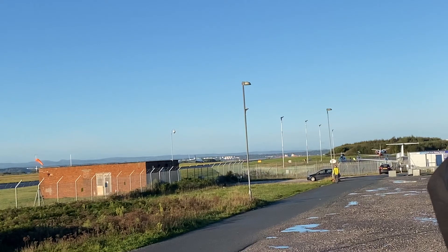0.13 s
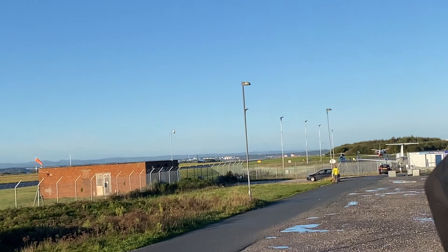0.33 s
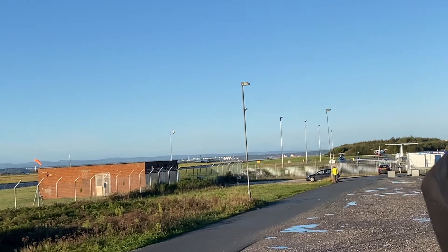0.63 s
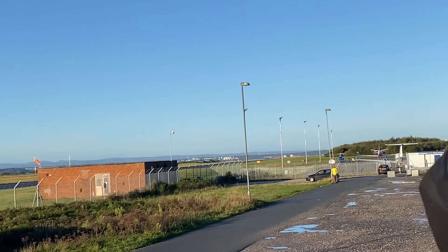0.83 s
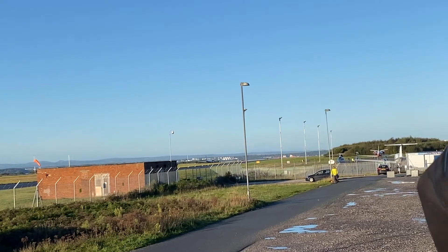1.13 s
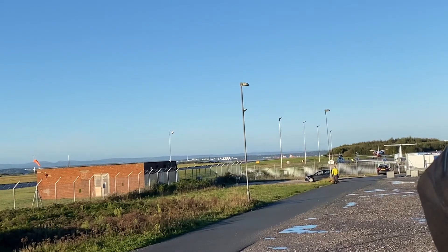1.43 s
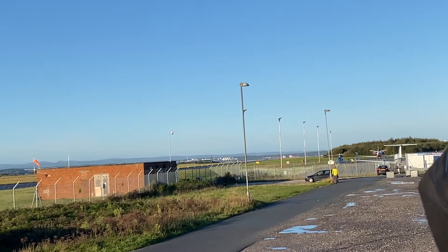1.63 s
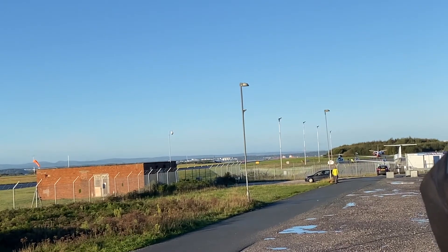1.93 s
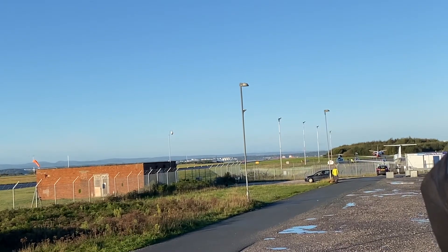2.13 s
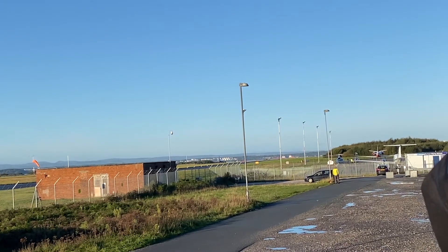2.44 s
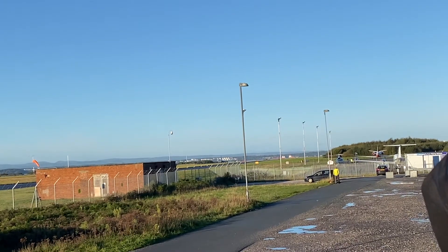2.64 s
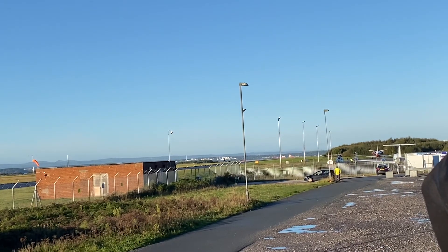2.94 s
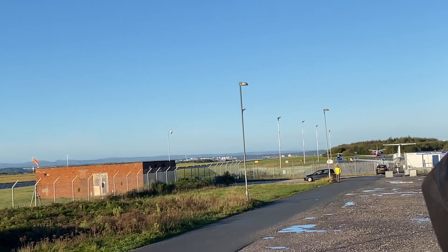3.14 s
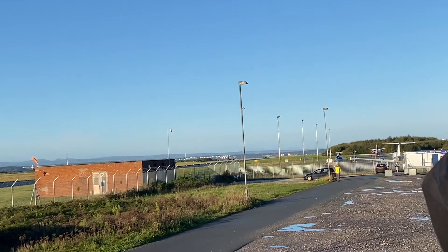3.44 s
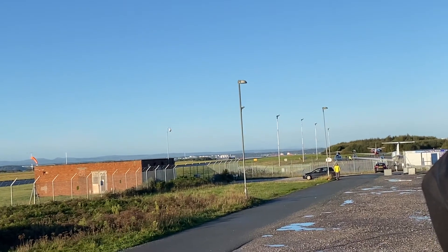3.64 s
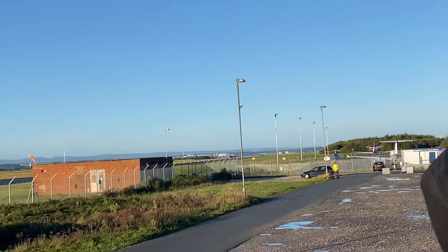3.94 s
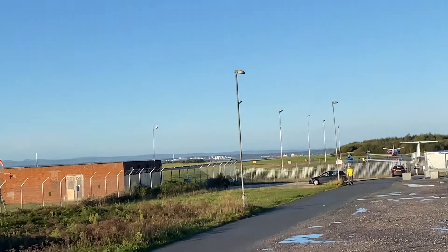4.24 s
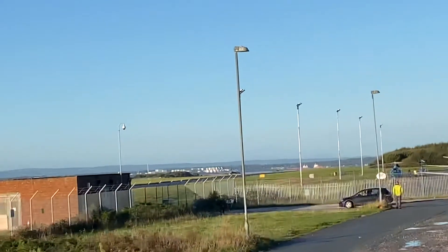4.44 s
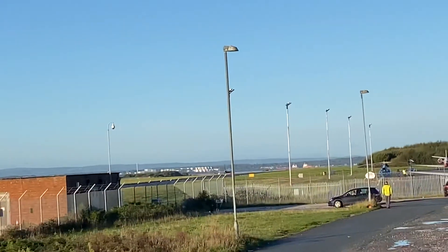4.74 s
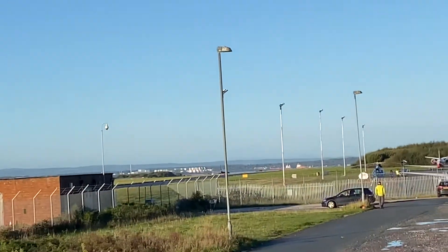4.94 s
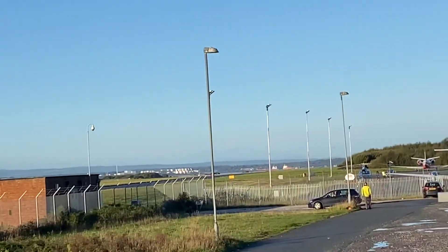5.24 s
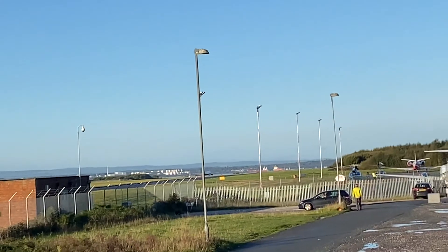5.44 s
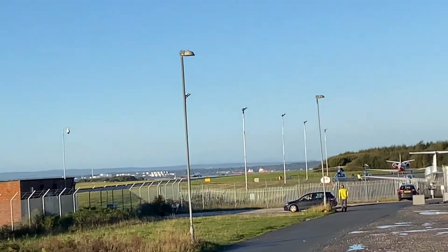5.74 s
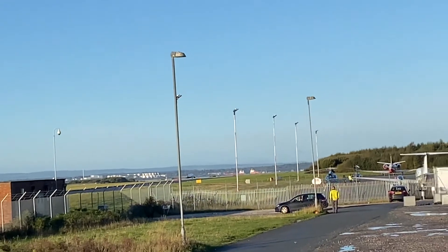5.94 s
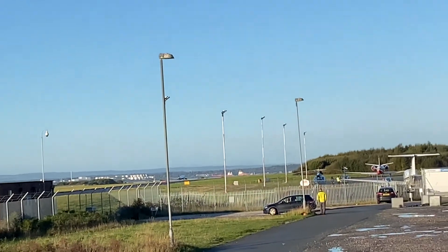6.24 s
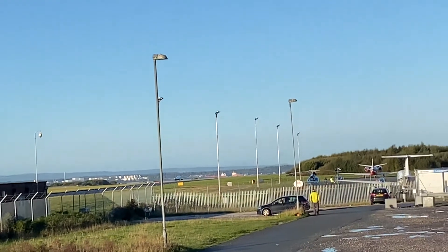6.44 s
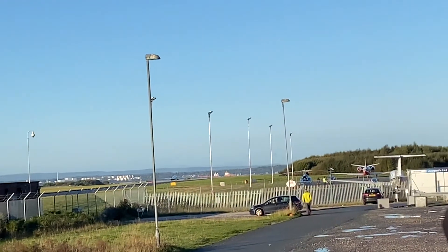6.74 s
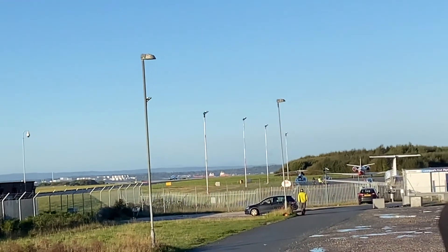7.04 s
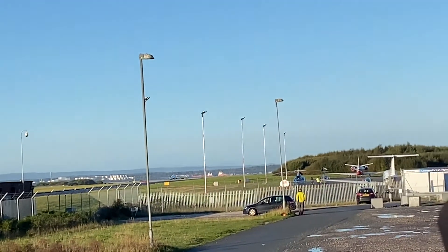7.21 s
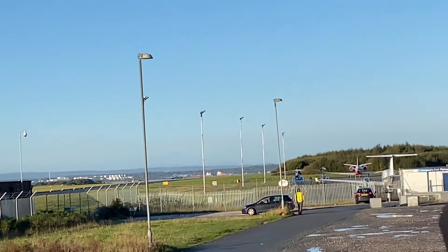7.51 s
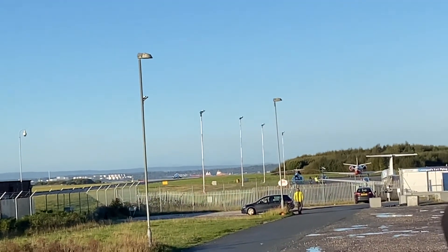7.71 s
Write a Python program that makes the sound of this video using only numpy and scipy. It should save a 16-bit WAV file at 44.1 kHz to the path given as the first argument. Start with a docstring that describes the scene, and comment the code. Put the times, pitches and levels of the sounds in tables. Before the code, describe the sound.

Outdoors at an airfield, the low rumble and rushing roar of a distant departing jet carry on throughout, easing slightly as it recedes. Soft booms and thumps rise out of the rumble, mostly in the first half, and light gusts brush the microphone. Closer by, small birds give quiet, high chirps and thin whistles with short echoes, thinning out toward the end.

```python
"""A deep rumble, a roar and a dull rush: a jet airliner climbs away far across an airfield.
Turbulent mixing of its exhaust radiates broadband noise, coloured by interference with the ground echo
and by absorption in the air; its fan adds a faint tone. Light wind buffets the two microphone ports.
Small songbirds whistle and chirp nearby in gliding, almost pure tones with short echoes.
Low booms and soft thumps come and go; faint clicks and the hiss of the microphone lie underneath."""
import sys
import numpy as np
from scipy import signal
from scipy.io import wavfile
from scipy.ndimage import uniform_filter1d

SR = 44100
rng = np.random.default_rng(int(sys.argv[2]) if len(sys.argv) > 2 else 0)


def waveform_to_disk(signal):
    """Save audio, clipped to [-1, 1], as 16-bit WAV at the path in sys.argv[1]."""
    frames = np.transpose(np.atleast_2d(signal))
    scaled = np.clip(frames, -1, 1) * 32767
    samples = np.round(scaled).astype(np.int16)
    wavfile.write(sys.argv[1], SR, samples)


N = 347067

# Spectra of the four exhaust ranges, lowest first: f/Hz, relative level/dB
RUMBLE_SPECTRUM = [(12, -44.5), (20, 1), (30, 3.5), (40, 9), (54, 21), (70, 19), (95, 2), (120, -60.5),
                   (200, -120)]
GROWL_SPECTRUM = [(53, -19.5), (90, -1.5), (129, -3), (195, -28), (250, -45.5), (430, -120)]
ROAR_SPECTRUM = [(100, -78.5), (190, -5), (280, 4), (405, -2.5), (527, 1.5), (700, -1.5), (850, -60.5),
                 (1400, -120)]
RUSH_SPECTRUM = [(410, -41.5), (700, -2.5), (763, 3), (842, -0.5), (907, -4), (976, -3), (1280, -9),
                 (1400, -10.5), (1690, -14.5), (1840, -14), (3050, -34), (3960, -46), (6710, -120)]
# The deep rumble, swelling and sinking unevenly: t/s, level/dB
RUMBLE_LEVELS = [(0, -25), (2.6, -28), (3.4, -30.5), (3.7, -23.5), (4.2, -29.5), (4.8, -24.5), (5.3, -27),
                 (5.75, -37.5), (6.2, -24.5), (6.4, -29.5), (6.85, -34), (7., -34.5), (7.2, -37.5),
                 (7.87, -35)]
# The other ranges: t/s, growl level/dB, roar level/dB, rush level/dB, lift near 1600 Hz/dB
EXHAUST_LEVELS = [(0, -35.5, -36, -44, -2.5), (1., -35.5, -39.5, -46, -3), (2.1, -34, -36, -42.5, -2.5),
                  (2.8, -34.5, -31.5, -41, 0), (3.5, -38, -37.5, -43, -2), (4.2, -32.5, -39.5, -44, -1),
                  (5.1, -36, -39, -44.5, 2.5), (5.8, -34, -40, -44, 3.5), (6.4, -37.5, -39.5, -43.5, 4.5),
                  (7.1, -33, -42, -43.5, -2), (7.87, -35, -43.5, -48, 2)]
def jet_exhaust():
    """Turbulent mixing noise in four swelling ranges; the upper two tilt as the air path changes."""
    t = np.arange(N) / SR
    growl_db, roar_db, rush_db, lift_db = curves(EXHAUST_LEVELS)
    lift = (lambda hz: bell(hz, 1600, 620), lift_db)
    dips = (ground_dips, -9.5 * bell(t, 4.3, 2.8))  # deepest midway through the climb
    upper_dips = (upper_ground_dips, -4 * bell(t, 6.1, 1.4))
    # Slopes in dB per octave: the roar loses bass, the rush dulls as the path lengthens.
    roar_tilt = (lambda hz: np.log2(hz / 330), -7.5 + .77 * t)
    rush_tilt = (lambda hz: np.log2(hz / 1100), 6 - .5 * t)
    absorption = (lambda hz: np.maximum(np.log2(hz / 3000), 0), -1.8 * t)
    rumble = noise(RUMBLE_SPECTRUM, size=4096, patchy_db=.5, swell_db=1.2)[0]
    growl = noise(GROWL_SPECTRUM, size=2048, patchy_db=.5, swell_db=1.6)[0]
    roar = noise(ROAR_SPECTRUM, size=2048, patchy_db=.58, swell_db=-1, bands_db=.82,
                 changes=[dips, roar_tilt])[0]
    rush = noise(RUSH_SPECTRUM, size=2048, patchy_db=.18, swell_db=.5, bands_db=1.84,
                 changes=[dips, upper_dips, lift, absorption, rush_tilt])[0]
    deep = amp(curves(RUMBLE_LEVELS)[0]) * rumble + amp(growl_db) * growl
    return deep + amp(roar_db) * roar + amp(rush_db) * rush


def comb(hz, spacing_hz=465):
    """Two-path interference: direct sound and ground echo oppose at odd multiples of half a spacing."""
    return (.5 - .5 * np.cos(2 * np.pi * hz / spacing_hz)) ** 2


def ground_dips(hz):
    """Relative depth of the destructive interference, greatest in the middle range."""
    return comb(hz) * (.11 + .63 * bell(hz, 695, 250)) * (hz > 465)


def upper_ground_dips(hz):
    """The same interference above the middle range."""
    return comb(hz) * np.clip((hz - 900) / 300, 0, 1)


# Sound scattered from both sides of the field: f/Hz, relative level/dB
SCATTER_SPECTRUM = [(150, -33.5), (260, -4), (571, -13), (918, -12), (985, -14), (1390, -17.5), (2900, -47),
                    (3770, -60), (6380, -120)]
def field_scatter(near_db=-44.5, far_db=-55, fade_s=1.5):
    """Scattering gives an incoherent side signal that weakens as the aircraft recedes."""
    level_db = far_db + (near_db - far_db) * np.exp(-np.arange(N) / SR / fade_s)
    return amp(level_db) * noise(SCATTER_SPECTRUM, size=1024, patchy_db=2.4, swell_db=1.2)[0]


# Fan tone before its random modulation: t/s, level/dB
FAN_LEVELS = [(0.0, -47.5), (.36, -55), (0.8, -50.5), (1.3, -54), (2.01, -56), (2.6, -50.5), (3.15, -53.5),
              (3.66, -66.5), (4.32, -53), (5.68, -55.5), (6.55, -50), (6.8, -55), (7.87, -59.5)]
def jet_fan(start_hz=926, end_hz=890, settle_s=2.6):
    """A tone that sinks as the jet draws away; the long path modulates its amplitude and phase."""
    hz = end_hz + (start_hz - end_hz) * np.exp(-np.arange(N) / SR / settle_s)
    a, b, c, d = drifts(4, size=1700)
    modulation = np.array([1.3 + a + 1j * b, c + 1j * d])
    front, side = (modulation * np.exp(2j * np.pi * np.cumsum(hz) / SR)).real
    return amp(curves(FAN_LEVELS)[0]) * ports(front, .4 * side)


# Low booms in the rumble and soft thumps: t/s, envelope peak level/dB, f/Hz
BOOMS = [(.049, -28.5, 59.4), (0.551, -15, 67.5), (1.802, -18, 65), (2.162, -17, 60), (2.347, -24, 54.6),
         (3.033, -20, 56.3), (3.94, -19, 65), (6.998, -15.5, 57), (0.327, -25, 195), (0.799, -25, 153),
         (1.002, -24, 221), (1.35, -30, 145), (3.47, -25, 166), (7.249, -25.5, 182), (7.438, -37, 202)]
def booms():
    """Gaussian tone bursts, a few cycles long and alike in both channels."""
    out, t = np.zeros(N), np.arange(-2000, 2000) / SR
    for s, db, hz in BOOMS:
        burst = amp(db) * bell(t, 0, .0053 + .9 / hz) * np.sin(2 * np.pi * hz * t)
        out[round(s * SR) - 2000:][:4000] += burst
    return out


# Buffeting at the ports: f/Hz, relative level/dB
WIND_SPECTRUM = [(9.4, -49), (16, -17), (45, 2.5), (70, -0.5), (141, -3.5), (420, -38), (550, -50.5),
                 (920, -120)]
# Gusts: t/s, level/dB
GUST_LEVELS = [(0, -33), (1.4, -35), (2.4, -38), (3.2, -41.5), (4.3, -37.5), (5.15, -31), (6.6, -39),
               (7.4, -30), (7.87, -46)]
def wind():
    """Turbulent pressure fluctuations, uncorrelated at the two ports."""
    return amp(curves(GUST_LEVELS)[0]) * noise(WIND_SPECTRUM, size=2048, patchy_db=2.2, swell_db=3.2)


# Trills gliding through a turning point: start t/s, turn delay/s, length/s, level/dB,
# first f/Hz, turn f/Hz, last f/Hz, chip rate/Hz, rise within a chip/Hz
BIRD_TRILLS = [(0.244, 0.012, 0.043, -68, 4830, 5180, 4700, 114, 311),
               (0.383, 0.011, 0.034, -68.5, 4400, 4670, 4480, 95, 299.5),
               (0.502, 0.11, .13, -75, 5400, 5400, 5200, 49, 497.5),
               (0.568, 0.036, 0.087, -73, 5200, 4760, 4630, 50.8, 499),
               (5.775, .04, .11, -81, 4800, 4300, 3300, 90, -200),
               (6.018, 0.065, .13, -75.5, 5020, 4550, 3700, 94, -200),
               (4.938, 0.046, 0.11, -65, 3630, 3450, 3730, 50, -200)]
# Notes, loudest at the turn: start t/s, turn delay/s, length/s, level/dB,
# first f/Hz, turn f/Hz, last f/Hz, blur (0-1)
BIRD_NOTES = [ (0.605, .015, 0.029, -83, 6420, 6080, 5230, 0.8),
              (0.629, 0.019, 0.03, -90, 7260, 6600, 6140, 0.9),
              (0.682, 0.013, .025, -78.5, 5950, 6140, 6040, .2),
              (1.481, 0.013, 0.025, -50, 4450, 4010, 4600, 0.4),
              (1.505, 0.011, 0.022, -50, 4340, 3780, 4240, 0.3),
              (1.536, 0.068, 0.066, -48.5, 3896, 3680, 3660, 0.15),
              (1.624, 0.0099, 0.022, -49, 4530, 3700, 3550, 0.03),
              (1.674, 0.018, 0.029, -51, 3810, 3730, 4010, 0.1),
              (2.77, 0.0081, 0.019, -58, 3160, 3500, 3340, 0.03),
              (2.933, 0.025, 0.046, -60, 4200, 3450, 3200, 0.15),
              (3.774, 0.0057, 0.013, -67, 4270, 4030, 3610, 0.6),
              (3.895, 0.011, 0.014, -68, 3980, 3620, 3250, 0.73),
              (3.96, 0.0088, 0.019, -69.5, 4140, 3800, 3400, 0.75),
              (4.034, 0.008, 0.026, -68, 5100, 4300, 2900, 0.9),
              (4.121, 0.01, 0.027, -70, 5180, 4350, 3000, 0.74),
              (4.398, 0.024, 0.029, -58.5, 3490, 3810, 3960, 0.2),
              (4.427, 0.031, 0.056, -54.5, 3900, 3860, 4220, 0),
              (4.692, 0.038, 0.052, -65.5, 5600, 4680, 4230, 0.6),
              (4.78, 0.035, 0.046, -63, 5870, 4430, 3850, 0.36),
              (4.877, 0.031, 0.061, -62.5, 5730, 4130, 3730, 0.35),
              (3.785, 0.02, 0.045, -80, 4600, 4450, 4400, 1),
              (5.97, 0.017, 0.059, -83.5, 4320, 3920, 3600, 0.55),
              (6.193, 0.012, 0.04, -83, 4900, 4400, 5000, 0.4),
              (6.72, 0.021, 0.031, -85, 4150, 3980, 3880, 1),
              (7.599, .014, 0.024, -77, 4800, 4380, 4220, 0.66)]
# Winding whistles, one contour each: t/s, f/Hz, level/dB
BIRD_PHRASES = [
    [(.83, 7300, -69), (.845, 7320, -73), (.93, 7800, -72), (1.01, 7560, -61.5), (1.08, 7580, -63.5)],
    [(1.087, 7700, -67.5), (1.2, 7860, -58.5), (1.225, 8030, -60.5), (1.26, 7850, -63.5), (1.3, 7920, -67),
     (1.406, 7850, -69)],
    [(1.762, 4380, -61), (1.766, 3770, -51.5), (1.8, 4060, -55.5), (1.82, 4350, -44.5),
     (1.846, 4340, -44.5), (1.878, 3350, -52), (1.9, 3360, -52.5), (1.948, 3520, -48.5), (1.984, 3340, -65)],
    [(2.575, 4920, -78), (2.593, 4010, -64.5), (2.623, 3930, -58), (2.637, 3350, -62)],
    [(2.672, 3750, -63), (2.695, 3150, -58), (2.71, 3330, -57), (2.735, 2800, -62)],
    [(3.25, 7250, -84), (3.32, 8350, -85), (3.39, 8850, -91), (3.5, 8600, -90), (3.62, 8350, -93)],
    [(4.205, 6650, -72), (4.217, 7040, -72.5), (4.231, 6450, -57), (4.25, 5970, -56), (4.3, 6460, -61),
     (4.339, 6270, -55)],
    [(4.54, 4930, -76.5), (4.556, 5830, -70.5), (4.586, 6200, -64.5), (4.616, 6170, -59.5),
     (4.636, 5750, -64), (4.66, 5000, -72)],
    [(7.545, 8500, -83), (7.558, 7260, -75), (7.584, 7700, -78.5), (7.61, 6800, -73)],
    [(7.732, 8400, -81.5), (7.745, 7670, -65.5), (7.768, 7950, -77), (7.79, 7300, -74), (7.83, 6800, -69),
     (7.862, 4500, -78)],
]
# Blur of each winding whistle (0-1)
BIRD_PHRASE_BLURS = [.04, .04, .1, .12, .12, .1, .04, .4, .2, .3]
def birds():
    """The direct-to-reverberant ratio falls with distance: farther birds have more blur and echo."""
    a, b = drifts(2, size=60)
    flutter = a + 1j * b
    direct = np.zeros(N)
    for s, turn, length, db, first, middle, last, chips_per_s, rise_hz in BIRD_TRILLS:
        contour = [(s, first, db), (s + turn, middle, db), (s + length, last, db)]
        direct += whistle(contour, flutter, roughness=.4, chips_per_s=chips_per_s, rise_hz=rise_hz)
    reflected = direct.copy()
    notes = [([(s, first, db - 4), (s + turn, middle, db), (s + length, last, db - 6)], blur)
             for s, turn, length, db, first, middle, last, blur in BIRD_NOTES]
    for contour, blur in notes + list(zip(BIRD_PHRASES, BIRD_PHRASE_BLURS)):
        note = whistle(contour, flutter, roughness=blur)
        direct += (1 - .55 * blur) * note
        reflected += (1 + 5 * blur) * note
    return direct + echoes(reflected)


def whistle(contour, flutter, roughness, chips_per_s=0, rise_hz=0):
    """Frequency modulation of a near sine along (t/s, f/Hz, level/dB); gating chops it into chips."""
    s, hz, db = np.transpose(contour)
    start = round(s[0] * SR)
    t = np.arange(start, min(round(s[-1] * SR), N)) / SR
    chip_phase = (t - s[0]) * chips_per_s % 1
    glide_hz = uniform_filter1d(np.interp(t, s, hz), size=1 + len(t) // 12, mode="nearest")
    phase = 2 * np.pi * np.cumsum(glide_hz + rise_hz * (chip_phase - .5)) / SR
    gate = np.sin(np.pi * chip_phase) ** 2 if chips_per_s else 1
    fade = np.clip(np.minimum(t - s[0], s[-1] - t) / .003, 0, 1)
    modulation = 1 + roughness * flutter[start:][:len(t)]
    tone = (modulation * np.exp(1j * phase)).real + amp(-53) * np.cos(2 * phase)
    out = np.zeros(N)
    out[start:][:len(t)] = np.sqrt(2) * amp(np.interp(t, s, db)) * gate * fade * tone
    return out


def echoes(song):
    """Reverberation: close reflections smear each glide, later ones thin out past the nearest sheds."""
    t = np.arange(SR // 2) / SR
    early = 5 * amp(-60 * t / .05) + 1.2 * amp(-60 * t / .12)
    late = amp(-60 * t / 1.3 - 8 * (t > .15) - 9 * (t > .27))
    taps = rng.standard_normal((len(t), 2)).T * (rng.random((len(t), 2)).T < .05)
    taps *= (early + late) * (t > .002)
    stirred = drifts(1, size=600) * song  # moving air blurs the echoes
    front, side = signal.fftconvolve(stirred, taps / np.linalg.norm(taps[0]), axes=1)[:, :N]
    return ports(amp(-10) * front, amp(-23.5) * side)


# Faint clicks close by: t/s, level before filtering/dB
CLICKS = [(3.96, -66), (4.2564, -56), (5.768, -68), (6.802, -66), (7.228, -65), (7.324, -58), (7.35, -68)]
def clicks():
    """Brief transients have broad spectra: fast-decaying noise bursts, band-passed to sound bright."""
    out, t = np.zeros(N), np.arange(200) / SR
    for s, db in CLICKS:
        out[round(s * SR):][:200] += amp(db - 60 * t / .006) * rng.standard_normal(200)
    return signal.sosfilt(signal.butter(2, [3000, 8000], "band", fs=SR, output="sos"), out)


# Microphone hiss: f/Hz, relative level/dB
HISS_SPECTRUM = [(2500, -30.), (3600, 1.), (5000, -1.), (7000, -3.), (8600, -9.), (11000, -7.),
                 (12000, -3.), (12600, -10.), (13500, -18.)]
def microphone_hiss():
    """Self-noise of the microphone, partly correlated between the channels."""
    front, side = amp(-89) * noise(HISS_SPECTRUM, size=1024, patchy_db=.4, swell_db=.2)
    return ports(front, .5 * side)


def amp(db):
    """Amplitude ratio of a level."""
    return 10 ** (np.asarray(db) / 20)


def bell(x, centre, width):
    """Gaussian curve of unit height."""
    return np.exp(-((x - centre) / width) ** 2)


def unit_rms(x):
    """Normalisation to unit mean power."""
    return x / np.sqrt(np.mean(x ** 2) + 1e-20)


def drifts(count, size):
    """Independent low-pass noises, each averaged twice over size samples."""
    return unit_rms(uniform_filter1d(uniform_filter1d(rng.standard_normal((N, count)).T, size), size))


def smooth_grid(grid, frames, bins):
    """Averaging over time and frequency turns random values into patches."""
    return unit_rms(uniform_filter1d(uniform_filter1d(grid, bins, axis=0), frames, axis=1))


def curves(rows):
    """Linear interpolation in time: one value per sample for each column after t/s."""
    s, *columns = np.transpose(rows)
    return [np.interp(np.arange(N) / SR, s, column) for column in columns]


def noise(spectrum, size, patchy_db, swell_db, changes=(), bands_db=0):
    """Fourier synthesis of two uncorrelated noises; a change is a spectral shape times a dB curve."""
    frames, hz = 4 * N // size + 5, np.fft.rfftfreq(size, 1 / SR)
    a, b, c, d, patches = rng.standard_normal((frames, len(hz), 5)).T
    patches = smooth_grid(patches, frames=20000 // size, bins=size // 150)
    bands = rng.standard_normal((frames, len(hz))).T
    bands = smooth_grid(bands, frames=90000 // size, bins=size // 500)  # narrow, lasting half a second
    swell = unit_rms(uniform_filter1d(rng.standard_normal(frames), size=1 + 8000 // size))
    frame_at = np.minimum(np.arange(frames) * size // 4, N - 1)
    table_hz, table_db = np.transpose(spectrum)
    mean_db = np.interp(np.log(hz + 1), np.log(table_hz + 1), table_db)
    level_db = mean_db[:, None] + patchy_db * patches + swell_db * swell + bands_db * bands
    level_db += sum(np.outer(shape(hz + 1), curve[frame_at]) for shape, curve in changes)
    spectra = np.array([a + 1j * b, c + 1j * d]) * amp(level_db)
    return unit_rms(signal.istft(spectra, nperseg=size, noverlap=3 * size // 4)[1][:, :N])


def ports(front, side):
    """Sum and difference of front and side sound give left and right."""
    return np.array([front + side, front - side])


def scene():
    """Superposition of all sources at the two ports."""
    airliner = ports(jet_exhaust(), field_scatter()) + jet_fan()
    return airliner + booms() + wind() + birds() + clicks() + microphone_hiss()


def record(dry):
    """Band limiting by a low-pass filter, after a 20 ms fade at the end."""
    faded = dry * np.minimum(np.arange(N)[::-1] / (.02 * SR), 1)
    low_pass = signal.firwin(511, cutoff=15700, window=("kaiser", 9), fs=SR)
    return signal.oaconvolve(faded, low_pass[None], "same")


dry = scene()
out = record(dry)
waveform_to_disk(out)
```